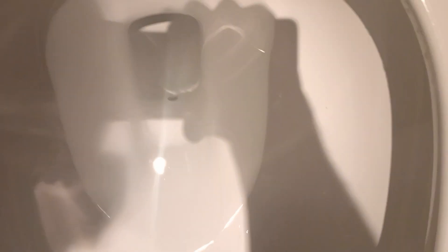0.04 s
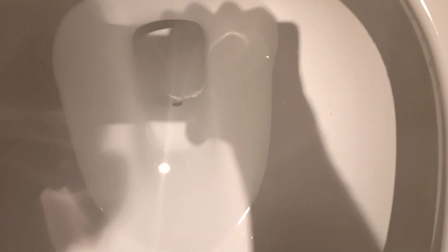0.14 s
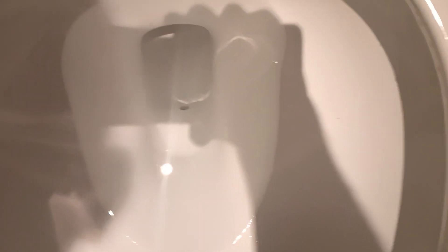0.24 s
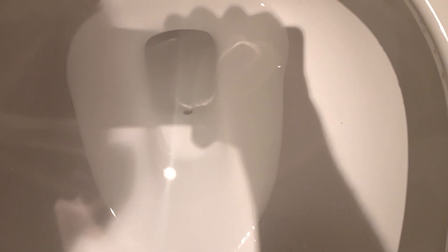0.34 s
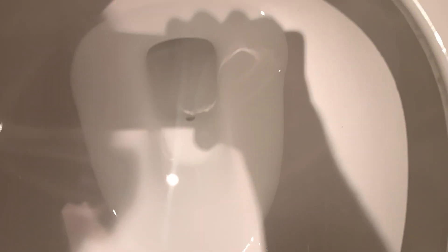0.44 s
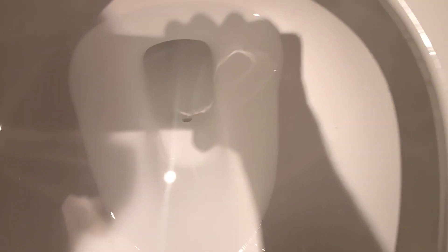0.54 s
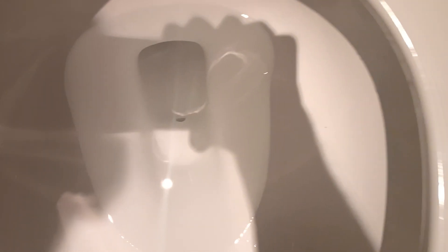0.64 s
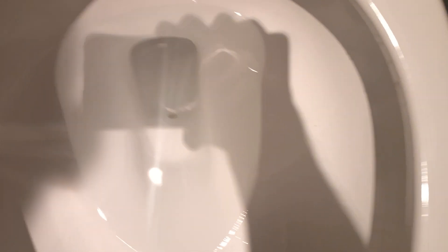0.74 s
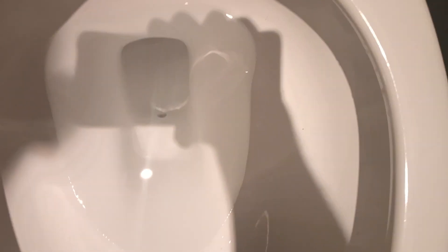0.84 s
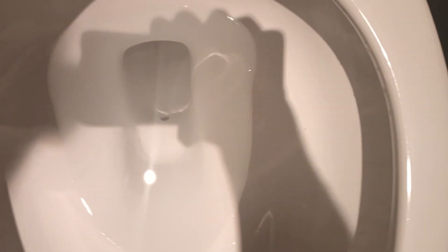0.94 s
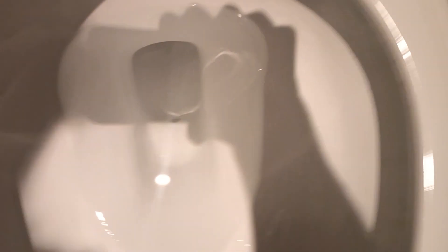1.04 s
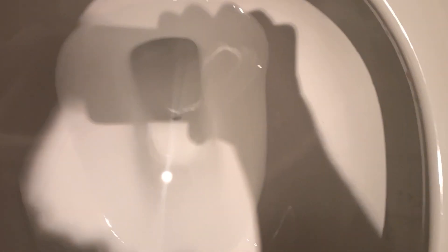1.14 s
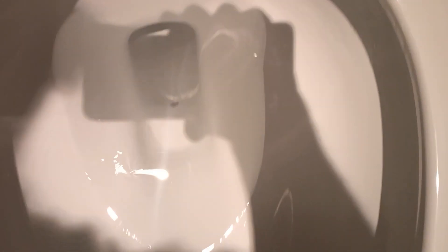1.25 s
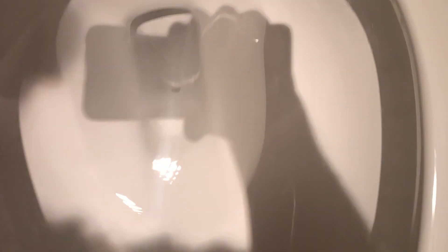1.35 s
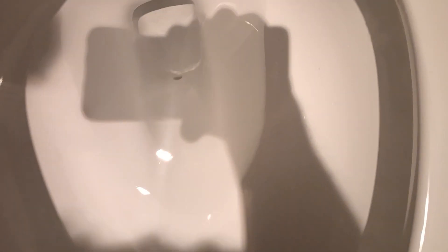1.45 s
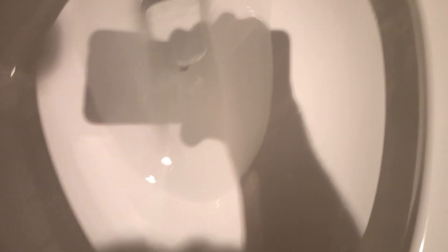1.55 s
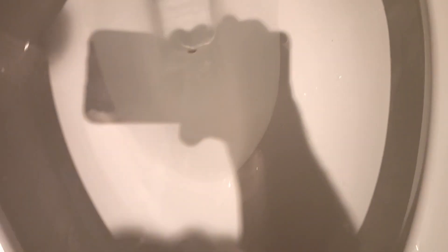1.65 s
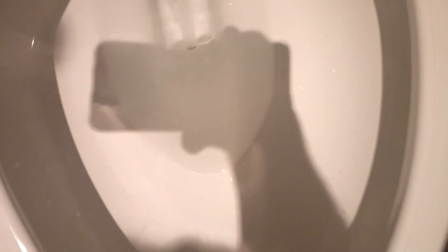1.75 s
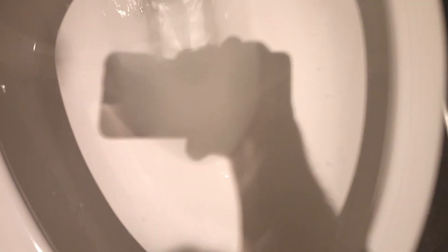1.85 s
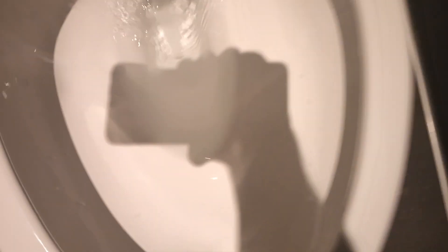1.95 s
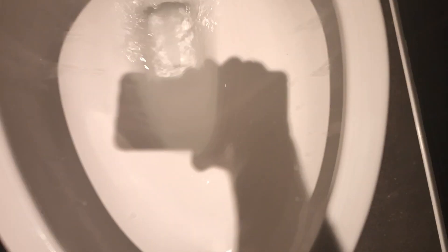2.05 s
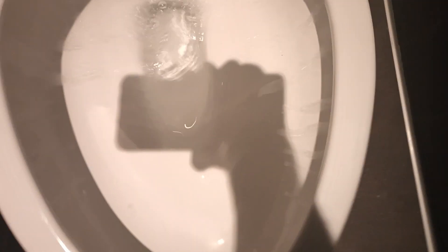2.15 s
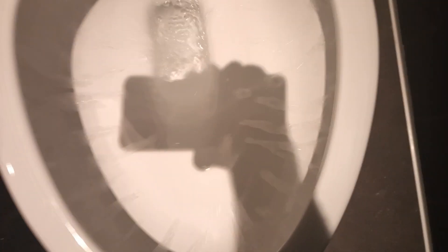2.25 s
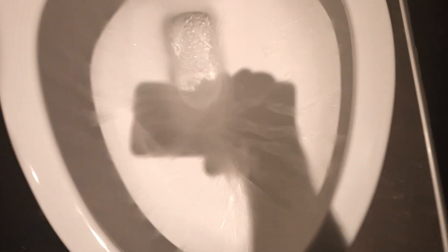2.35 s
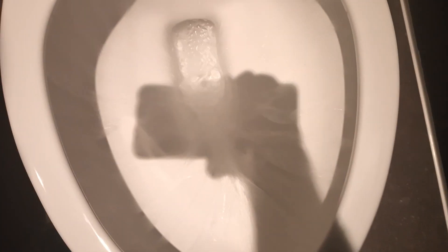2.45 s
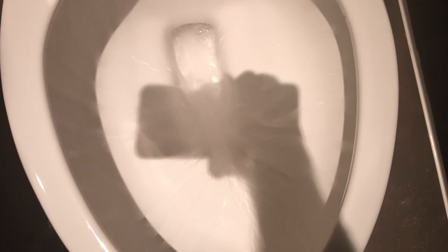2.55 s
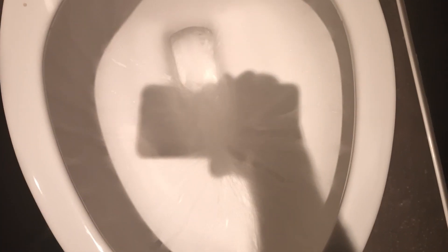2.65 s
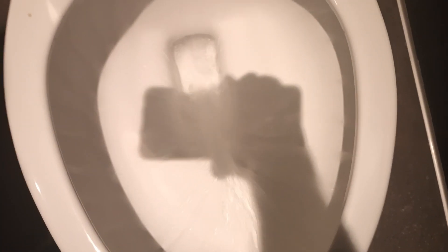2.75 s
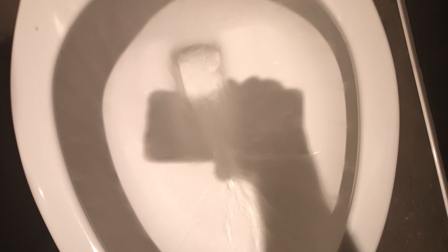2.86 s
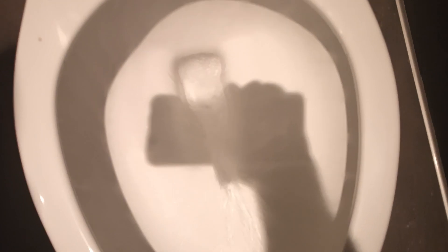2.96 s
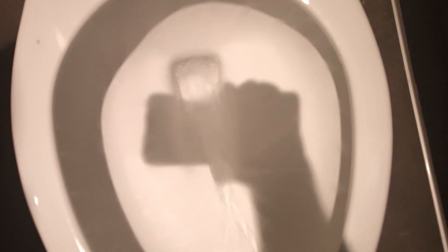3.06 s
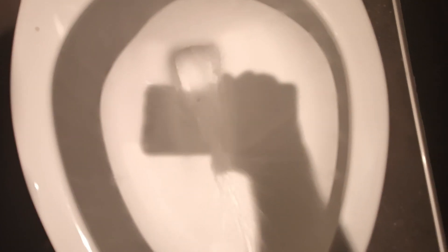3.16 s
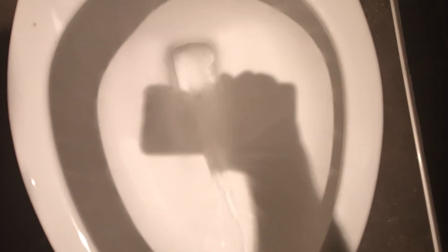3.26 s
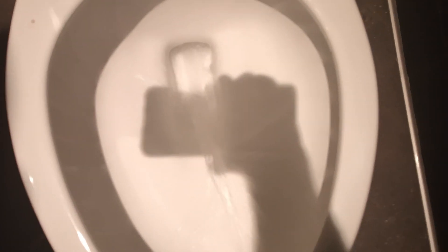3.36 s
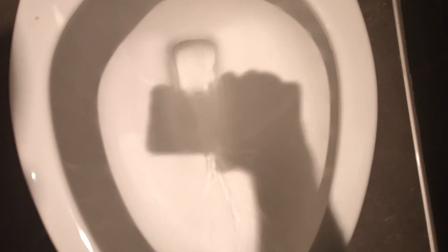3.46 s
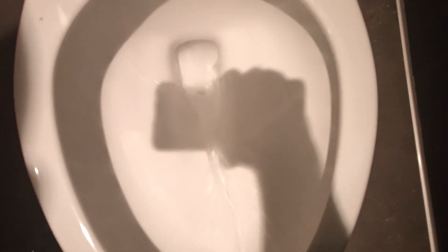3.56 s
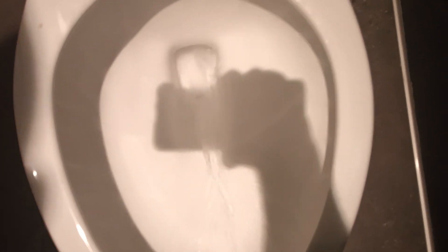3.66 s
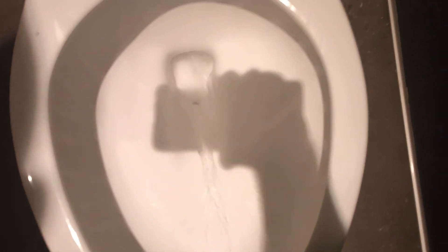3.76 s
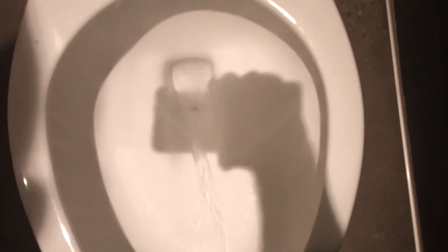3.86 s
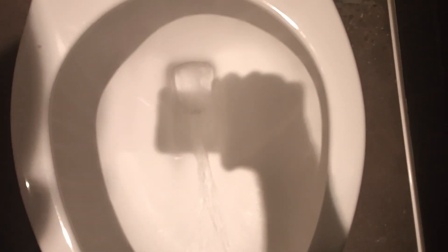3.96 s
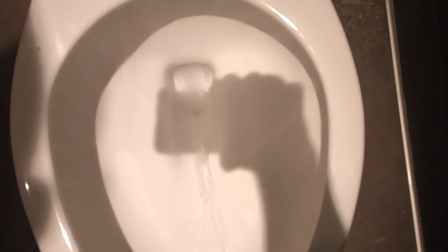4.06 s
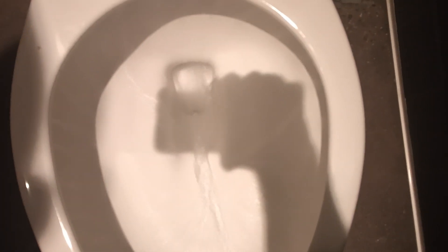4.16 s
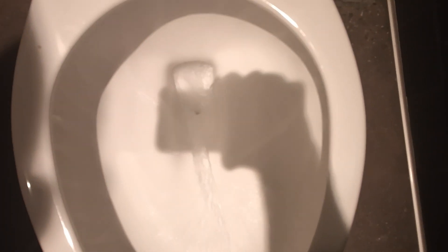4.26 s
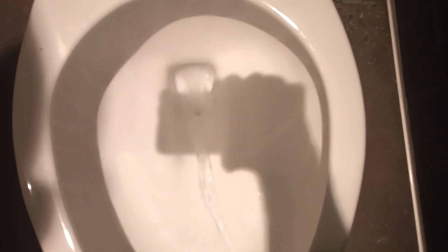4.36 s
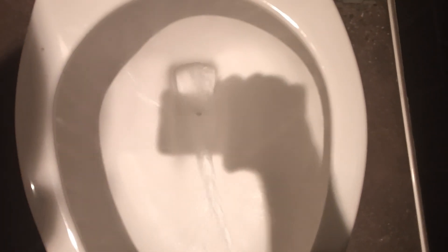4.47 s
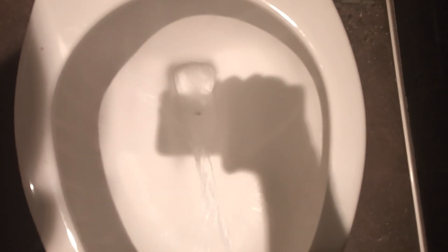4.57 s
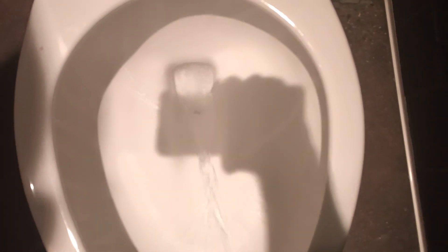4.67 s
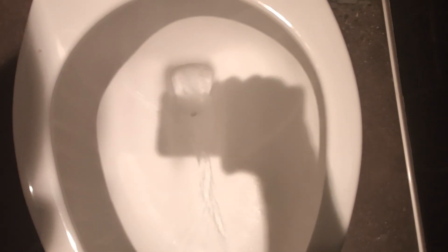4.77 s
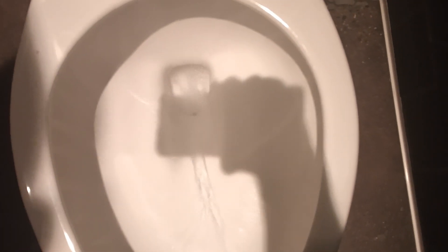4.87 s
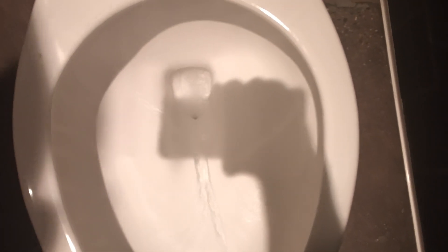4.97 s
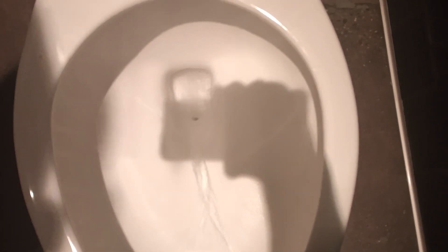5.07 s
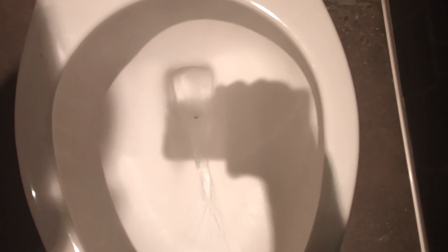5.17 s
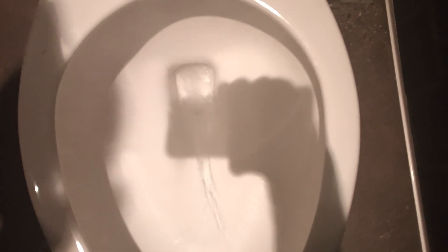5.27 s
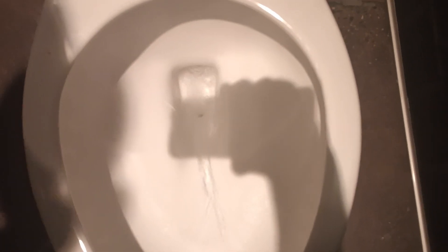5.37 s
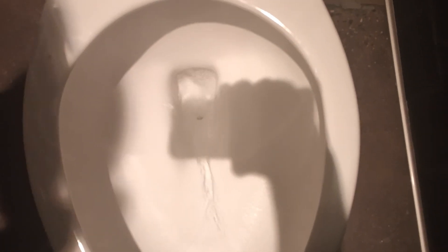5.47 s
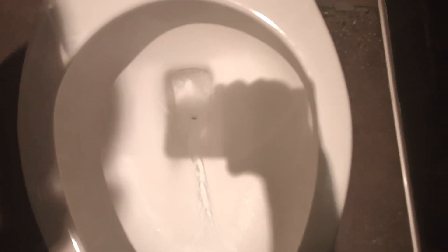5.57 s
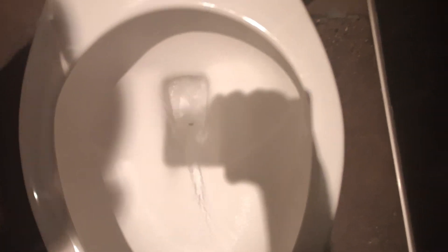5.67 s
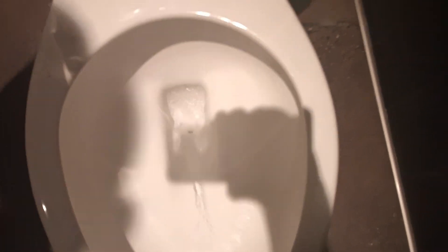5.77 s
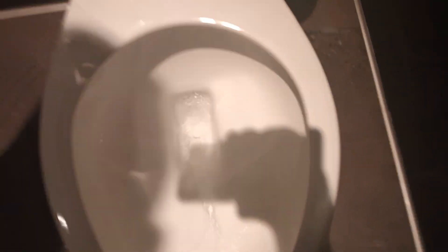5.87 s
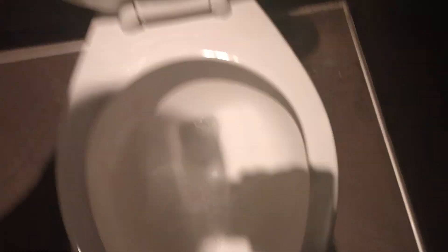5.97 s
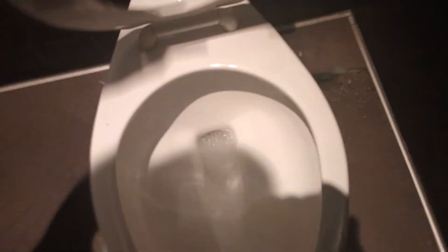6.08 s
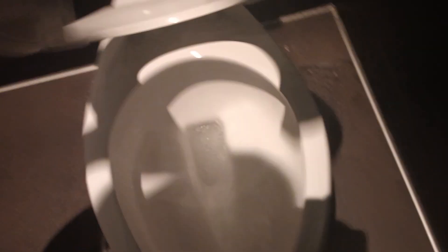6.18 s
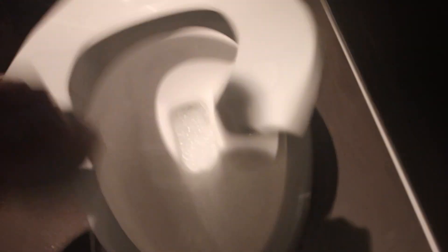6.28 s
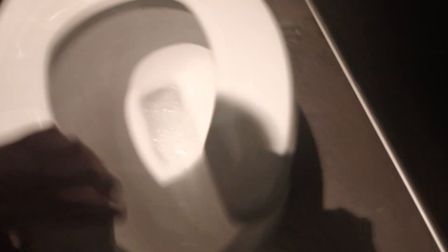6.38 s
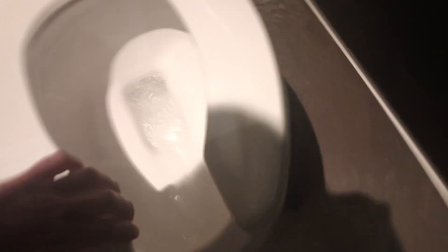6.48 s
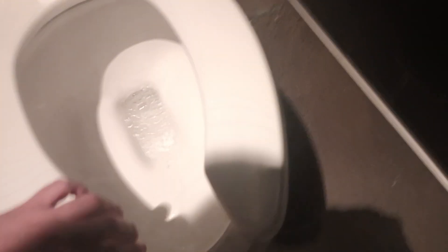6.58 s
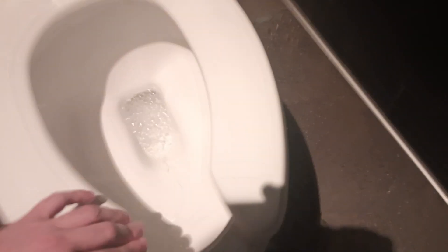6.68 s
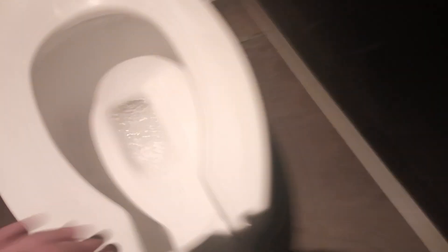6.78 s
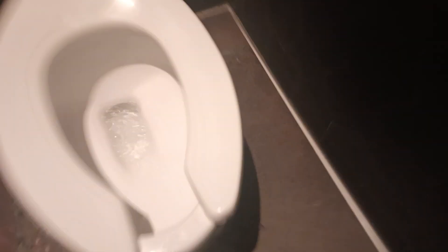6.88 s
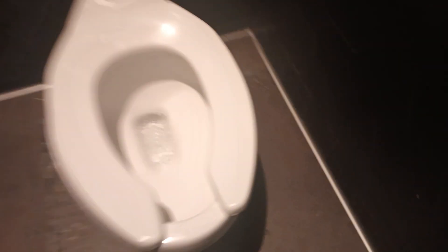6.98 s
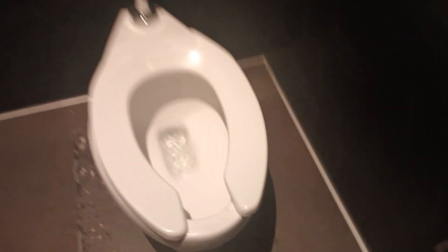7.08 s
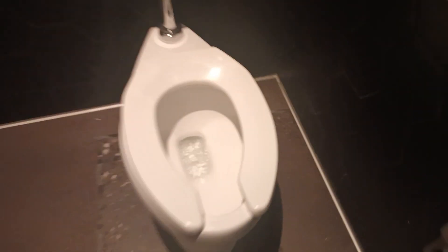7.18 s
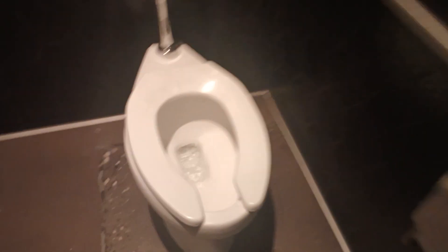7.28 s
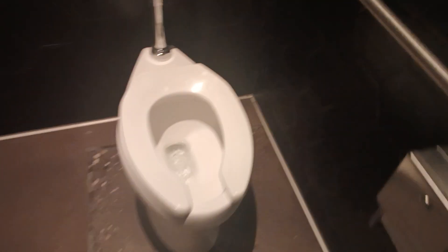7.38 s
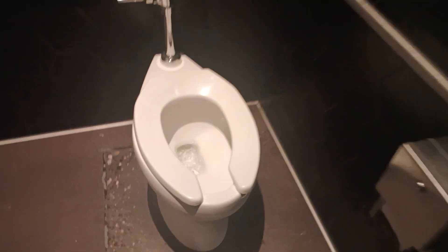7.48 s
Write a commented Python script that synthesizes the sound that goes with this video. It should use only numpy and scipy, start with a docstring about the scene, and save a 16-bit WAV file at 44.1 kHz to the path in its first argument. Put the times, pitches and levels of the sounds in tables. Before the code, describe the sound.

A tiled bathroom heard in stereo from just above a toilet bowl. From 0 to 1.1 s there is only soft fan air and low motor hum, with faint hollow stirs, a sleeve rustle and a tiny lever click. At 1.13 s a pipe hums briefly and the valve snaps open with a sharp hiss; by 1.45 s the jet roars at its loudest, with deep rapid gulps and froth until about 1.9 s. The roar falls while splashing spray builds; around 2.6 s the siphon slurps and plops, and bright wash surges until 3.3 s. From 3.5 to 6 s a steadier hissing splash with scattered burbles and drops gradually thins, with soft handling bumps. At 6.53 s a hinge squeaks; at 6.74 s the seat slams hard, then bounces ever faster until 7.15 s, ringing in china and tiles. A dull knock comes at 7.3 s over a faint trickle.

```python
"""A flush-valve toilet in a tiled bathroom with a fan running, heard in stereo from just above the bowl.
After faint hollow stirs and a sleeve's rustle the pipe hums as a wavering sine and the valve hisses open in noise.
The jet surges as noise through the trap's modes, with sine gulps and a froth of bubbles; the siphon slurps.
Drops, bubbles and hiss make the rim spray, which splashes and burbles on bare china, then dwindles.
The seat squeaks down, slams and chatters as ringing modes and noise; the china rings on and a dull knock follows."""
import sys
import numpy as np
from scipy import signal
from scipy.fft import rfft, irfft, next_fast_len
from scipy.io import wavfile
from scipy.ndimage import uniform_filter1d, map_coordinates

SR = 44100
rng = np.random.default_rng(int(sys.argv[2]) if len(sys.argv) > 2 else 0)


def inscribe(sig):
    """Save sig as 16-bit PCM at rate SR to the path in sys.argv[1].

    A 1-D sig is mono; a 2-D sig holds one channel per row.
    Samples are clipped to [-1, 1] before scaling.
    """
    pcm = np.round(np.clip(np.atleast_2d(sig).T, -1, 1) * 32767)
    wavfile.write(sys.argv[1], SR, pcm.astype(np.int16))


N = 332514
TIME = np.arange(N) / SR  # s

OPEN_S, AIR_S = 1.135, 1.493  # the valve opens; the air escaping from the rim holes peaks
SLAM_S = 6.7442  # the seat first meets the rim
SETTLE_S, SETTLE_POWER = .405, 4  # its bounces die out over this time; how late the settling sets in
# water running over bare china, relative levels: (t/s, splash/dB, fine spray/dB)
WASH = [(1.72, -42, -47.5), (1.83, -38.5, -39), (1.98, -31.5, -33), (2.01, -33.5, -36.5),
        (2.34, -26.5, -35.5), (2.45, -32.5, -48), (2.62, -34, -47.5), (2.67, -34, -28.5),
        (2.81, -27.5, -26.5), (3.13, -28, -29), (3.2, -25, -27.5), (3.47, -34.5, -33), (4.92, -35, -33),
        (5.27, -38, -34), (5.37, -35, -35), (5.99, -40, -43.5), (6.39, -54.5, -61), (6.68, -64.5, -67.5)]


def amp(db):
    """Decibels to gain."""
    return 10 ** (np.asarray(db) / 20)


def unit(x):
    """Scale to rms 1."""
    return x / np.sqrt(np.mean(x ** 2) + 1e-20)


def along(points, hz):
    """Read (f/Hz, value) points on a log frequency axis."""
    f, v = np.transpose(points)
    return np.interp(np.log(hz + 1), np.log(f + 1), v)


def wobble(rate):
    """A smooth random curve, rate knots a second."""
    coarse = TIME[::SR // 1000]
    knots = rng.standard_normal(2048)
    return np.interp(TIME, coarse, map_coordinates(knots, [coarse * rate], mode="wrap"))


def swell(peak_s, peak_db, rise_db_per_s, fall_db_per_s):
    """A gain that climbs to a peak and dies away, both evenly in dB."""
    return amp(peak_db + np.minimum(rise_db_per_s * (TIME - peak_s), fall_db_per_s * (peak_s - TIME)))


def bell(s, length, db):
    """A gain that swells and fades smoothly around time s."""
    return amp(db) * np.exp(-2 * ((TIME - s) / length) ** 2)


def narrow(hz, width):
    """A narrow band of noise of rms 1: a carrier with random slow amplitude and phase."""
    phase = 2 * np.pi * hz * TIME
    return unit(wobble(width) * np.cos(phase) + wobble(width) * np.sin(phase))


def filtered(x, response):
    """x times a complex response of frequency."""
    m = next_fast_len(N + SR // 2)
    return irfft(rfft(x, m) * response(np.fft.rfftfreq(m, 1 / SR)), m)[..., :N]


def colour(points):
    """The causal minimum-phase response with this spectrum, by folding the cepstrum."""
    def response(hz):
        cepstrum = irfft(np.log(amp(along(points, hz))))
        half = len(cepstrum) // 2
        folded = np.r_[cepstrum[0], 2 * cepstrum[1:half]]
        return np.exp(rfft(folded, len(cepstrum)))
    return response


def resonances(modes, skew=0):
    """Left and right response of cavity modes; by turns each leads in one channel by phase, skew radians."""
    turn = 1j * skew * np.array([[1], [-1]])

    def group(f, rows):
        return sum(amp(db) / (1 + 1j * (f * f - c * c) / (w * (f + 1))) for c, w, db in rows)
    return lambda f: np.exp(turn) * group(f, modes[::2]) + np.exp(-turn) * group(f, modes[1::2])


def stereo(pair):
    """Mix two unrelated signals, as mid and side, into left and right that are alike in the bass."""
    # likeness of the two channels: (f/Hz, correlation)
    alike = [(330, 0.78), (450, 0.5), (650, 0.093), (1500, 0.044), (4000, 0.054), (10000, 0.077)]

    def mid_side(hz):
        turn = np.arccos(np.clip(along(alike, hz), -1, 1)) / 2
        return np.array([np.cos(turn), np.sin(turn)])
    mid, side = filtered(pair, mid_side)
    return np.array([mid + side, mid - side])


def add(track, s, sound):
    """Mix a sound in at time s."""
    part = track[..., round(s * SR):][..., :sound.shape[-1]]
    part += sound[..., :part.shape[-1]]


def room(x):
    """The tiled room's tail: noise in which each frequency dies at its own speed."""
    # decay of the tiled room: (f/Hz, t60/s)
    tiles = [(100, 1), (260, 0.92), (1000, 0.79), (2500, 0.98), (4000, 0.9), (6000, 0.6), (14000, 0.18)]
    hz, t, z = signal.stft(rng.standard_normal((2, SR + SR // 2)), SR, nperseg=256)
    tail = signal.istft(z * amp(-60 * t / along(tiles, hz)[:, None]), SR, nperseg=256)[1]
    tail = tail / np.linalg.norm(tail[0])
    return stereo(signal.fftconvolve(x[None], tail, axes=1)[:, :N])


def fan():
    """The extractor fan: soft air noise that wavers in patches of time and pitch, and a motor hum."""
    # air noise spectrum: (f/Hz, relative level/dB)
    air_spectrum = [(25, -48), (65, -22), (110, -18), (145, -23), (220, -15), (340, -28.5), (560, -23),
                    (800, -28), (1500, -32.5), (3200, -40), (6000, -52), (8500, -65)]
    # motor hum before it sinks: (f/Hz, rms level/dB)
    hum_lines = [(70, -61.5), (97.5, -54.5)]
    z = signal.stft(rng.standard_normal((2, N)), nperseg=2048)[2]
    patches = uniform_filter1d(rng.standard_normal(z.shape[1:]), size=3, axis=0)
    patches = uniform_filter1d(patches, size=7, axis=1)
    air = signal.istft(z * amp(3 * unit(patches)), nperseg=2048)[1][:, :N]
    air = unit(stereo(filtered(air, colour(air_spectrum))))
    hum = sum(np.sqrt(2) * amp(db + 1.8 * wobble(3.29)) * np.sin(2 * np.pi * hz * TIME + 0.24 * wobble(4.7))
              for hz, db in hum_lines)
    sinking = amp(np.interp(TIME, [.85, 1.1, 7], [0, -6, -14]))
    return amp(-54.5) * air + hum * sinking


def knocks():
    """Fingers bump softly at the microphone and something knocks dully on the floor: decaying low noise."""
    # handling bumps: (t/s, level before colouring/dB)
    handling = [(0.921, -41), (1.259, -24.5), (1.359, -27.5), (4.048, -38), (4.93, -32), (5.271, -35),
                (6.27, -32), (6.349, -31)]
    # a dull knock after the slam: (t/s, level before colouring/dB)
    floor_knock = [(7.303, -23)]
    bumps, thud, t = np.zeros(N), np.zeros(N), np.arange(SR // 3) / SR

    def puff(t60, attack):
        return amp(-60 * t / t60) * (1 - np.exp(-t / attack)) * rng.standard_normal(len(t))
    for s, db in handling:
        add(bumps, s - .01, amp(db) * puff(t60=0.43, attack=0.0061))
    for s, db in floor_knock:
        add(thud, s - .01, amp(db) * puff(t60=0.18, attack=0.017))
    bumps = filtered(bumps, colour([(25, -17), (45, -1), (65, 18), (120, 13), (250, -7), (800, -53)]))
    thud = filtered(thud, colour([(50, -24), (100, -5), (170, 8), (400, 12.5), (700, 14.5),
                                  (1100, -11), (3000, -37)]))
    return bumps + thud + amp(-8.0) * room(thud)


def stirs():
    """Before the flush, narrow noise swells as faint hollow sounds and broad noise as a sleeve's rustle."""
    # hollow sounds in the quiet room: (middle t/s, length/s, level/dB, f/Hz, width/Hz)
    hollow = [(.34, .11, -56, 635, 50), (.53, .05, -48, 205, 30), (0.606, 0.055, -57, 425, 89.7),
              (0.982, .06, -51, 241, 30.2)]
    # a sleeve brushes past as the hand reaches for the lever: (middle t/s, length/s, level/dB)
    rustles = [(.59, .09, -66), (.8, 0.22, -68)]
    cloth = rng.standard_normal((2, N)) * amp(2 * wobble(60))
    cloth = unit(filtered(cloth, colour([(600, -10), (1500, 2), (5500, -1), (8000, -20)])))
    hollow_tones = sum(bell(s, length, db) * narrow(hz, width) for s, length, db, hz, width in hollow)
    return hollow_tones + cloth * sum(bell(*row) for row in rustles)


def ticks():
    """Faint metal clicks of flush lever and seat hinge: short bursts of treble-heavy noise."""
    # clicks: (t/s, level/dB)
    clicks = [(0.9288, -62), (6.5304, -50)]
    track, t = np.zeros(N), np.arange(SR // 8) / SR
    for s, db in clicks:
        add(track, s, amp(db - 60 * t / .12) * np.diff(rng.standard_normal(len(t) + 1)) / 2)
    return track


def hinge():
    """The hinge chirps, then sings faintly as the seat swings down: two unsteady sines."""
    # squeaks: (start t/s, length/s, level/dB, f/Hz)
    squeaks = [(6.533, .06, -44.5, 885), (6.6, .13, -57, 1203)]

    def arch(s, length):
        return np.sqrt(np.abs(np.sin(np.pi * np.clip((TIME - s) / length, 0, 1))))
    return sum(amp(db + 2 * wobble(70)) * arch(s, length) * np.sin(2 * np.pi * hz * TIME + .6 * wobble(90))
               for s, length, db, hz in squeaks)


def seat_blows():
    """Impulses of the slam, then of ever quicker, weaker bounces until the seat lies still."""
    # first contacts of seat and rim: (t after the slam/s, relative strength/dB)
    contacts = [(0, 5), (.003, 6), (.0052, 5), (.017, -5), (.232, -13), (.32, -12), (.335, -14),
                (.452, -29)]
    bounces, bounce_db, fall_db_per_s, settle_db = 24, -8, 22, 11.5
    slam, chatter = np.zeros(N), np.zeros(N)
    for delay, db in contacts:
        add(slam, SLAM_S + delay, amp([db]))
    k = np.arange(bounces)
    delays = SETTLE_S * (1 - .95 ** (k + 1)) / (1 - .95 ** bounces)
    for delay, (late, size) in zip(delays, rng.standard_normal((bounces, 2))):
        # weakening fastest just before the seat lies still
        weaker_db = fall_db_per_s * delay + settle_db * (delay / SETTLE_S) ** SETTLE_POWER
        add(chatter, SLAM_S + delay + 0.001998 * late, amp([bounce_db - weaker_db + size]))
    return slam, chatter


def seat_ring(blows):
    """Each contact lands on another spot and so rings the damped modes in its own proportions."""
    # ringing of seat and china: (f/Hz, relative level/dB, t60/s)
    seat_modes = [(281.5, -7.5, 0.55), (655, -12, 0.27), (708, -18, .4), (774, -17, 0.45), (848, -11, .3),
                  (926, -10, 0.4), (986, -4, 0.23), (1123, -4, 0.18), (1195, -8, 0.18), (1288, -5, 0.42),
                  (1416, -11, .4), (1880, -13.5, .35), (2174, -13, 0.32), (2380, -10, 0.45),
                  (2410, -8, 0.2), (3260, -12, 0.45), (3450, -10, 0.39), (3690, -11, 0.52)]
    scatter_db = 3
    flat_db, flat_hz, flat_width_hz = 16, 1000, 130  # settling, it slaps flatter: favours modes near flat_hz
    track, t = np.zeros((2, N)), np.arange(SR) / SR
    hz, db, t60 = np.transpose(seat_modes)
    decay = amp(db[:, None] - 60 * t / t60[:, None])
    modes = decay * np.exp(2j * np.pi * hz[:, None] * t) * (1 - np.exp(-t / .00012))
    for at in np.flatnonzero(blows):
        settled = min((at / SR - SLAM_S) / SETTLE_S, 1)
        favour_db = flat_db * settled ** SETTLE_POWER * np.exp(-((hz - flat_hz) / flat_width_hz) ** 2)
        size = amp(favour_db + scatter_db * rng.standard_normal(len(hz)))
        spot = size * np.exp(2j * np.pi * rng.random((2, len(hz))))
        add(track, at / SR, blows[at] * (spot @ modes).real)
    return track


def seat():
    """Every contact clacks, duller as the seat slows; seat and china ring and the tiles throw it back."""
    # clack spectrum: (f/Hz, relative level/dB)
    crack = [(88, -86), (150, -29), (270, 3), (475, -27.5), (580, -4), (1170, 1), (1290, 0.5), (1690, -10),
             (2310, -7), (2600, -12), (3550, -9.5), (3950, -15), (4350, -25), (6390, -27.5), (7600, -52),
             (16000, -64)]
    t = np.arange(SR) / SR
    slam, chatter = seat_blows()
    hard = amp(-30 * np.maximum(TIME - SLAM_S, 0))  # slower contacts lose their treble

    def struck(blows, response):
        return signal.fftconvolve(blows[None], np.atleast_2d(response), axes=1)[:, :N]

    def energy(x):  # scale to mean energy 1 per channel
        return unit(x) / np.sqrt(N)

    def dulled(x):
        return hard * x + filtered((1 - hard) * x, lambda hz: 1 / (1 + (hz / 3900) ** 10))
    ring = stereo(seat_ring(slam + chatter))
    # noise power after each blow: t60 33 ms for the slam, 100 ms for the chatter
    power = struck(slam ** 2, amp(-120 * t / 0.033)) + amp(4) * struck(chatter ** 2, amp(-120 * t / 0.1))
    noise = np.sqrt(np.abs(power)) * rng.standard_normal((2, N))
    clack = stereo(filtered(dulled(noise), colour(crack)))
    echo = room(filtered(dulled(slam + chatter), colour(crack)))
    return amp(19) * energy(clack) + amp(17) * energy(ring) + amp(17.5) * energy(echo)


def china():
    """The bowl rings on faintly after the slam: long damped sines that beat unevenly."""
    # ring of the china: (f/Hz, level/dB, t60/s)
    china_modes = [(1297, -41, 2.2), (2370, -37, 1.5)]
    age = np.maximum(TIME - SLAM_S, 0)

    def beating(hz):
        return amp(2 * wobble(45)) * np.sin(2 * np.pi * hz * age + wobble(20))
    return (age > 0) * sum(amp(db - 60 * age / t60) * np.array([beating(hz), beating(hz)])
                           for hz, db, t60 in china_modes)


def pipe():
    """As the valve lifts, the air column in the pipe hums one rough low note before any water arrives."""
    level = swell(peak_s=1.15, peak_db=-23.5, rise_db_per_s=560, fall_db_per_s=120)
    return level * amp(2 * wobble(70)) * np.sin(2 * np.pi * 240 * TIME + .5 * wobble(70))


def valve():
    """The valve snaps open with a noise spit of compressed air, then sizzles until the air is driven out."""
    # spectrum of the spit: (f/Hz, relative level/dB)
    hiss_spectrum = [(410, -54), (700, -28), (934, 15.5), (1060, -9), (1330, -22), (1480, -21), (1600, -44),
                     (3000, 4), (4400, 7), (6000, -3), (7890, -35), (16000, -11)]
    age = np.maximum(TIME - OPEN_S - .003, 0)
    spit = unit(stereo(filtered(rng.standard_normal((2, N)), colour(hiss_spectrum))))
    treble = colour([(4000, -34), (8000, -7.5), (12000, -3.5), (16000, -1)])
    sizzle = unit(filtered(rng.standard_normal((2, N)), treble))
    escaping = swell(AIR_S, -43, rise_db_per_s=17, fall_db_per_s=51)
    return (spit * amp(-30.5 - 60 * age / 0.37) + sizzle * escaping) * (1 - np.exp(-age / 0.0016))


def drained():
    """How far the bowl has emptied, 0-1."""
    start_s, end_s = 2.43, 2.44
    return np.clip((TIME - start_s) / (end_s - start_s), 0, 1)


def wash():
    """Gains of splash and spray: they build as the china is bared and end in a trickle."""
    rise_db_per_s, trickle_fall_db_per_s = 36, 3.5
    s, *columns = np.transpose(WASH)
    before_db = rise_db_per_s * np.maximum(s[0] - TIME, 0)
    after_db = trickle_fall_db_per_s * np.maximum(TIME - s[-1], 0)
    return [amp(np.interp(TIME, s, c) - (before_db + after_db)) for c in columns]


def flow():
    """Gains of rumble, churn, splash and spray: once the valve is open their causes add in power."""
    jet_peak_s, froth_lag_s = 1.465, 0.14  # the jet strikes; its froth follows
    air_rise, air_fall = 401, 72  # dB/s
    opened = np.clip((TIME - OPEN_S) / 0.0011, 0, 1)

    def together(*gains):
        return opened * np.sqrt(sum(g ** 2 for g in gains))
    splash, spray = wash()
    # air trapped in the pipe is pushed through the trap first
    prime = swell(1.265, -22, rise_db_per_s=700, fall_db_per_s=0)
    prime = prime * np.clip((jet_peak_s + froth_lag_s - TIME) / froth_lag_s, 0, 1)
    # then the water jet strikes and loses pressure
    push = together(prime, swell(jet_peak_s, -12.5, rise_db_per_s=620, fall_db_per_s=17.5))
    froth = swell(jet_peak_s + froth_lag_s, -17.5, rise_db_per_s=88, fall_db_per_s=20.5)
    # the siphon sucks air as the bowl runs empty
    siphon = swell(2.63, -19.5, rise_db_per_s=54, fall_db_per_s=110)
    # air driven out of the rim holes: a fine hiss, then a coarse sputter as water arrives
    air = swell(AIR_S, -32, air_rise, air_fall)
    sputter = swell(1.558, -27.5, air_rise, air_fall)
    # the rim holes hiss as soon as the pipe is under pressure
    leak = amp(-41.5 - 29 * np.maximum(TIME - OPEN_S, 0))
    trickle = amp(-48.5)  # water running on in the trap
    return (together(push, amp(-15) * splash, trickle),
            together(amp(-13.5) * push, froth, siphon, amp(-8.5) * splash),
            together(amp(-1) * leak, sputter, amp(.5) * splash),
            together(leak, air, amp(1) * spray))


def shimmer(spray):
    """The spray sets the rim channel singing: narrow noise bands, each swelling and fading by itself."""
    # wavering resonances of the rim channel: (f/Hz, width/Hz, level over the spray/dB)
    rim_modes = [(2160, 120, -8.5), (2400, 170, -11), (3210, 90, -14), (4130, 170, -9.5)]
    return spray * sum(amp(db + 3.5 * wobble(9)) * np.array([narrow(hz, width), narrow(hz, width)])
                       for hz, width, db in rim_modes)


def squeals():
    """Now and then a rim jet catches a resonance and flutters on it: brief narrow noise."""
    # squeals: (middle t/s, length/s, level/dB, f/Hz)
    caught = [(2.1, .06, -33, 4090), (4.43, .04, -37, 4130), (5.17, .05, -35, 4820)]
    width_hz = 70
    return sum(bell(s, length, db) * np.array([narrow(hz, width_hz), narrow(hz, width_hz)])
               for s, length, db, hz in caught)


def splats():
    """Each heavy drop smacks china or water: a noise crack and a tiny ringing bubble."""
    # heavy drops: (t/s, level before colouring/dB, ring f/Hz, ring t60/s)
    heavy_drops = [(1.8161, -23, 5120, 0.037), (1.8819, -20, 4080, .02), (1.9433, -18, 5520, .03),
                   (1.959, -18.5, 4570, .05), (2.6706, -18, 6450, .03), (2.943, -18, 5820, .03),
                   (2.8392, -19, 5100, .02), (3.0348, -16, 6020, .05), (3.184, -17, 4700, 0.056),
                   (3.7113, -23, 4160, .06), (4.1612, -19, 4890, 0.033), (5.0772, -23, 4130, .02),
                   (4.5431, -22, 5230, 0.028)]
    track, t = np.zeros((2, N)), np.arange(SR // 5) / SR
    for s, db, hz, t60 in heavy_drops:
        ring = amp(-4 - 60 * t / t60) * np.sin(2 * np.pi * (hz * t + rng.random((2, 1)) / 3))
        crack = amp(-8.5 - 60 * t / .036) * rng.standard_normal((2, len(t)))
        add(track, s, amp(db) * (ring + crack))
    return filtered(track, colour([(1000, -21), (3500, 0), (6500, 0.5), (8500, -7), (16000, -8)]))


def drops(rate, spread_db):
    """Random impacts, rate a second, of log-normal size; each reaches the two channels differently."""
    hit = rng.random(N) < rate / SR
    size = amp(spread_db * np.clip(rng.standard_normal(N), -2.5, 2.5))
    return unit(hit * size * rng.standard_normal((2, N)) / np.sqrt(rate))


def bubbles(low_hz, high_hz, cycles, spread_db, count):
    """A cloud of small bubbles, each a damped sine rising in pitch at its own place between the channels."""
    when, pitch, place = rng.random((3, count, 1), dtype=np.float32)
    size = amp(spread_db * np.clip(rng.standard_normal((count, 1)), -2, 2))
    k = np.arange(SR // 90)
    age = low_hz * (high_hz / low_hz) ** pitch * k.astype(np.float32) / SR / cycles
    fade = np.exp(-3 * age) * (1 - (k / len(k)) ** 2).astype(np.float32)
    ring = fade * np.sin(2 * np.pi * cycles * age * (1 + 0.078 * age))
    at = ((when * N).astype(int) + k).ravel()
    return unit(np.array([np.bincount(at, (ring * (size * side(2 * np.pi * place))).ravel(), N)[:N]
                          for side in (np.cos, np.sin)]))


def rim_wash(splash, spray):
    """A smooth hiss from the valve is joined by drops and bubbles once the water strikes bare china."""
    # spectrum of the coarse splash: (f/Hz, relative level/dB)
    splash_spectrum = [(500, -35), (950, -7.5), (1250, -4), (1600, -4), (1950, -1.5), (2200, 0),
                       (2480, 3.5), (2750, -1.5), (3400, -0.5), (4000, -3.5), (5000, -13), (7000, -40)]
    # spectrum of the fine spray: (f/Hz, relative level/dB)
    spray_spectrum = [(2400, -44.5), (3300, -8), (4300, -1), (5400, 2), (6800, -1), (8000, -10),
                      (11000, -13.5), (13700, -21.5), (14900, -5.5), (16000, -17)]
    bare = np.clip((TIME - 1.7) / 0.083, 0, 1)
    rate = 1200 + 2500 * splash / splash.max()  # more water, more drops

    def hiss():
        return (1.3 - 0.2 * bare) * rng.standard_normal((2, N))
    coarse_cloud = bubbles(1125, 4180, cycles=60, spread_db=4.5, count=2000)
    fine_cloud = bubbles(2911, 9290, cycles=94, spread_db=2.0, count=5000)
    coarse = hiss() + bare * (drops(rate, spread_db=0.5) + amp(-10.5) * coarse_cloud)
    fine = hiss() + bare * (drops(rate, spread_db=2.0) + amp(-7) * fine_cloud)
    coarse = amp(0.6) * splash * unit(filtered(coarse, colour(splash_spectrum)))
    fine = amp(2.5) * spray * unit(filtered(fine, colour(spray_spectrum)))
    return (coarse + fine) * amp(.8 * wobble(35) + .4 * wobble(11))  # the level flickers


def churning(churn):
    """A dense froth of mid-sized bubbles and impacts tumbles in the bowl."""
    # froth spectrum: (f/Hz, relative level/dB)
    froth_spectrum = [(330, -26.5), (470, -1), (620, 0.5), (780, 0), (1000, -1), (1250, -4.5),
                      (1500, -10.5), (2500, -51.5)]
    cloud = bubbles(495, 1277, cycles=14, spread_db=2.0, count=1500)
    froth = drops(rate=4000, spread_db=0.0) + amp(-13.5) * cloud
    return amp(-3.5) * churn * unit(filtered(froth, colour(froth_spectrum)))


def bowl(pair):
    """Water heard directly and through the air modes of the bowl, which change as it empties."""
    # air modes of the full bowl: (f/Hz, width/Hz, relative level/dB)
    full_modes = [(462.6, 10.6, 9.5), (648.7, 7.9, 8.3), (676.3, 5.3, 10), (881, 5.6, 9), (950, 26, 5.6),
                  (1284, 17, 6.3), (1623, 21, 9), (1870, 16, 7.7), (2172, 10, 5), (2833, 34, 6.5),
                  (3435, 7.9, 5.8)]
    # air modes of the empty bowl: (f/Hz, width/Hz, relative level/dB)
    empty_modes = [(598, 17, 3), (889.5, 12, 11.8), (1006, 36, 7), (1092, 62, 4.5), (1450, 34, 7.1),
                   (1727, 173, 2.4), (2203, 34, 5.6)]
    # balance of the water: (f/Hz, left over right/dB)
    lean = [(60, 2), (180, -8), (550, 2.5), (1650, -1.0), (4970, -1.0), (15000, 2.5)]
    full = filtered((1 - drained()) * pair[0], resonances(full_modes, skew=0.83))
    empty = filtered(drained() * pair[0], resonances(empty_modes, skew=0.47))
    water = stereo(pair) + amp(2.5) * full + amp(-4.5) * empty
    return filtered(water, lambda hz: amp(along(lean, hz) * np.array([[.5], [-.5]])))


def bursts(rows, t60, attack, rise, rough):
    """Each bubble is a sine that swells, rings unevenly and climbs in pitch as it nears the surface."""
    track, t = np.zeros(N), np.arange(SR // 3) / SR
    shape = amp(-60 * t / t60) * (1 - np.exp(-t / attack)) ** 2
    shiver = rough * wobble(90)
    for s, db, hz in rows:
        phase = 2 * np.pi * hz * t * (1 + rise * t) + shiver[round(s * SR):][:len(t)]
        add(track, s - attack, amp(db) * shape / shape.max() * np.sin(phase))
    return track


def trails(rows, count):
    """Rows (t/s, level/dB, f/Hz) of the weaker bubbles that each plop sheds, scattered in pitch."""
    gap_s, loss_db, detuning = .03, -6.5, 0.0795
    chance = rng.standard_normal((len(rows), count, 2))
    return [(s + gap_s * (k + late / np.pi), db + loss_db * k, hz * np.exp(detuning * detune))
            for (s, db, hz), draws in zip(rows, chance)
            for k, (late, detune) in enumerate(draws, start=1)]


def burbles(count):
    """Rows (t/s, level/dB, f/Hz) of random bubbles in the emptied bowl, following the wash that stirs them."""
    # cavities that they ring: (f/Hz, level over the wash/dB)
    cavities = [(250, -8.5), (600, -7.5), (950, -5)]
    start_s, end_s = 2.3, 5.9
    s, splash_db, _ = np.transpose(WASH)
    when = start_s + (end_s - start_s) * (np.arange(count) + rng.random(count)) / count
    hz, db = np.array(cavities)[rng.permutation(count) % len(cavities)].T
    hz = hz * np.exp(0.0905 * rng.standard_normal(count))
    return np.transpose([when, np.interp(when, s, splash_db) + db, hz])


def gurgle():
    """Big gulps in the trap and smaller plops in the sump, answered by the room."""
    # single air pockets bursting in the trap: (t/s, relative level/dB, f/Hz)
    pockets = [(1.274, -14, 293), (1.302, -18, 250), (1.33, -14.5, 315), (1.359, -9, 320),
               (1.372, -13, 380), (1.462, -7, 322), (1.486, -7.5, 291), (1.503, -9.5, 365),
               (1.522, -5.5, 334), (1.561, -8, 285), (1.596, -7.5, 297), (1.633, -8, 298), (1.667, -9, 296),
               (1.704, -14, 246), (1.762, -13, 300), (1.806, -17, 302), (1.866, -10.5, 252),
               (1.91, -17, 245), (1.976, -16, 250), (2.93, -32, 256), (3.219, -31, 237), (3.9, -36.5, 256),
               (4.11, -35, 240), (4.3, -34, 250), (4.358, -30.5, 230), (4.4, -34.5, 254),
               (5.896, -28.5, 276), (5.92, -31.5, 290), (6.714, -33, 284)]
    # the loudest bubbles in the sump: (t/s, level/dB, f/Hz)
    sump = [(2.51, -26, 571), (2.569, -17.5, 617), (2.6, -22, 930), (2.621, -22, 700), (2.642, -19, 887.5),
            (2.661, -23.5, 599), (2.728, -25, 882), (2.934, -24, 883), (3.005, -25.5, 901),
            (3.13, -30.5, 602), (3.245, -21.5, 984), (3.639, -30.5, 884), (4.125, -34.5, 580),
            (4.171, -32.5, 950), (4.261, -32, 978), (4.301, -30.5, 879), (5.025, -29.5, 800),
            (5.29, -38, 590), (5.44, -37, 600), (5.633, -35, 748), (5.655, -33, 583), (5.675, -37.5, 787)]
    lead_s = .00014  # the gulps reach the left channel first
    overtones = [(s, db - 14.5, hz * 1.48) for s, db, hz in pockets]  # a wobbling pocket also rings higher
    gulps = amp(-1.2) * bursts(pockets + overtones, t60=.062, attack=.007, rise=.2, rough=.35)
    small = [*sump, *trails(sump, count=2), *burbles(count=42)]
    plops = bursts(small, t60=.1, attack=.006, rise=.3, rough=.8)
    sides = filtered(gulps, lambda hz: np.exp(1j * np.pi * hz * lead_s * np.array([[1], [-1]])))
    return sides + plops + room(amp(-15) * gulps + amp(-6) * plops)


def jet(rumble):
    """Turbulence and collapsing air pockets drum on the trap, which sounds deeper once it has emptied."""
    # air modes of the full trap: (f/Hz, width/Hz, relative level/dB)
    full_modes = [(238, 8.6, 5.5), (289.6, 13.7, 2), (316.4, 11, 2), (402, 13, -12)]
    # air modes of the empty trap: (f/Hz, width/Hz, relative level/dB)
    empty_modes = [(197, 16, -17), (257.4, 21, -0.5), (297.4, 23, -6.5), (331, 24, -14)]

    def through(modes):
        def response(f):
            band = 1 / (1 + (190 / (f + 1)) ** 6) / (1 + (f / 520) ** 6)
            return resonances(modes, skew=.11)(f) * band
        return unit(filtered(drive[0], response))
    drive = drops(rate=2300, spread_db=2.5) + rng.standard_normal((2, N))
    roar = np.sqrt(1 - drained()) * through(full_modes) + np.sqrt(drained()) * through(empty_modes)
    # the jet's steady pressure evens out the swells
    pressure = np.sqrt(np.abs(uniform_filter1d(np.mean(roar ** 2, axis=0), size=SR // 30)) + 1e-4)
    lumps = amp(2.8 * drained() * wobble(20))  # the emptied trap swallows in lumps
    return amp(-5.0) * rumble * lumps * unit(roar / pressure)


def scene():
    """Water, seat and the room's own sounds together."""
    rumble, churn, splash, spray = flow()
    quiet = fan() + knocks() + stirs() + ticks()
    closing = hinge() + seat() + china()
    in_bowl = bowl(churning(churn) + rim_wash(splash, spray))
    rim = shimmer(wash()[1]) + squeals() + splats()
    water = pipe() + valve() + jet(rumble) + in_bowl + rim + gurgle()
    return quiet + closing + water


def record(dry):
    """The microphone channel rounds off the highest peaks and keeps nothing above its band limit."""
    top_hz = 16100
    held = dry / (1 + np.abs(dry) ** 6) ** (1 / 6)
    return filtered(held, lambda hz: hz < top_hz)


dry = scene()
out = record(dry)
inscribe(out)
```